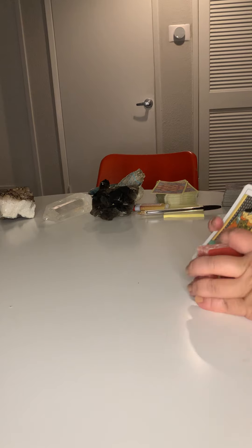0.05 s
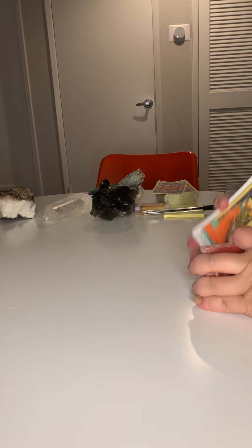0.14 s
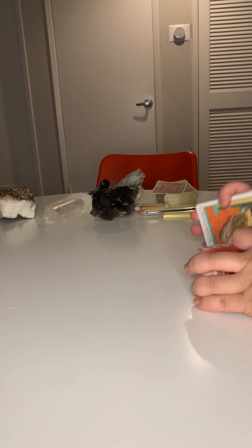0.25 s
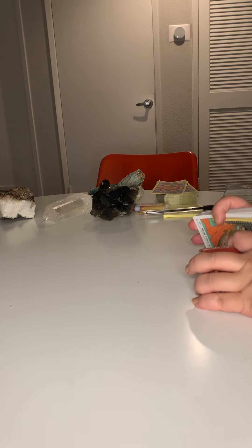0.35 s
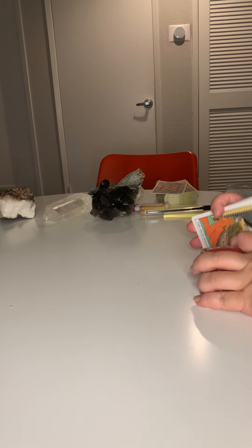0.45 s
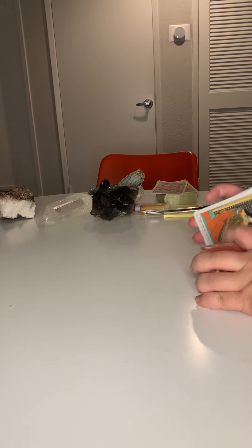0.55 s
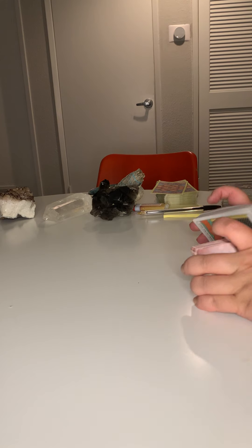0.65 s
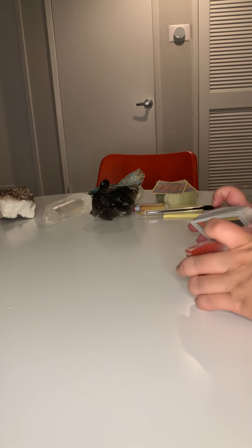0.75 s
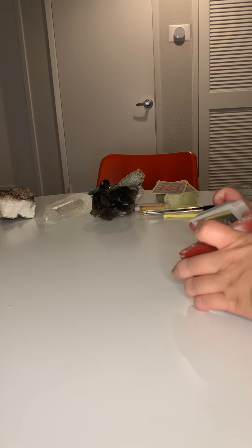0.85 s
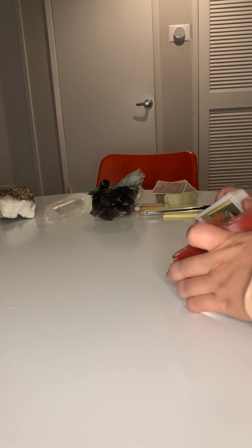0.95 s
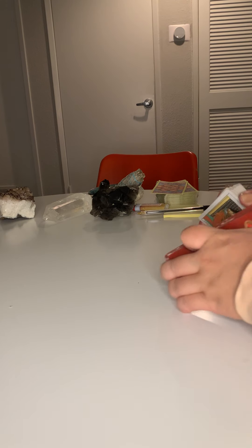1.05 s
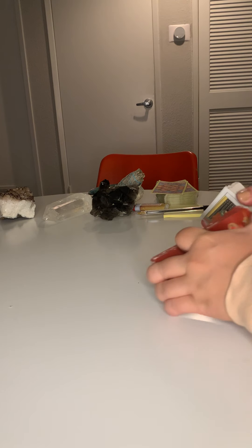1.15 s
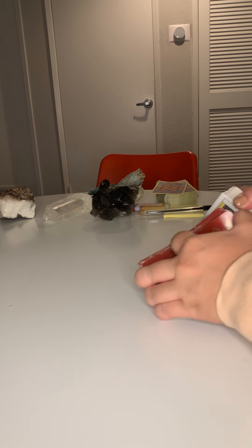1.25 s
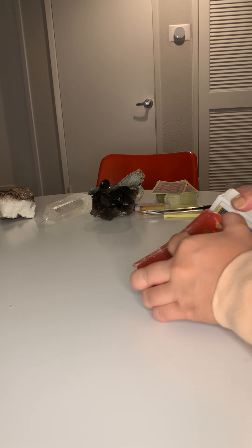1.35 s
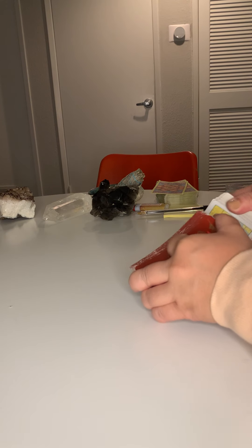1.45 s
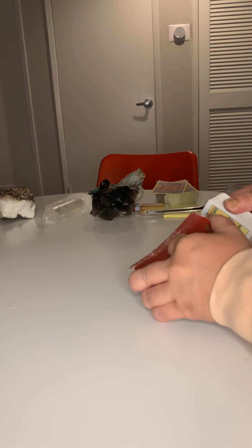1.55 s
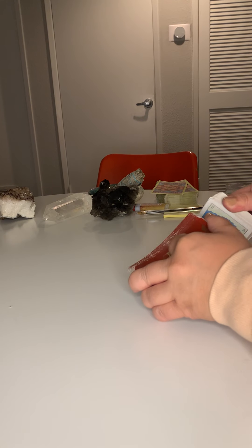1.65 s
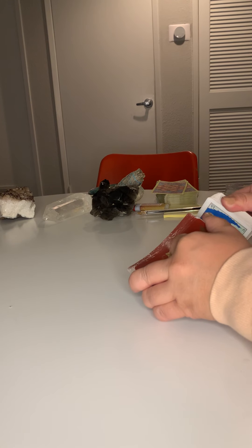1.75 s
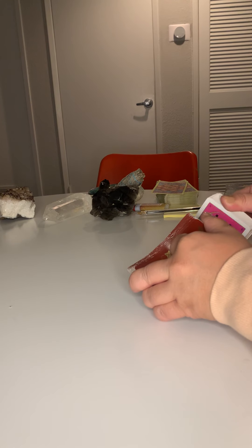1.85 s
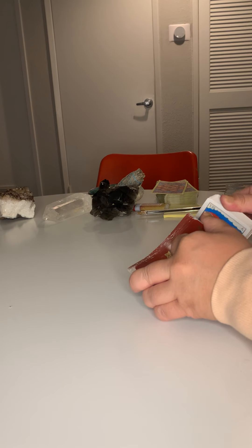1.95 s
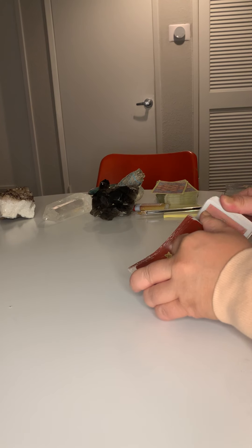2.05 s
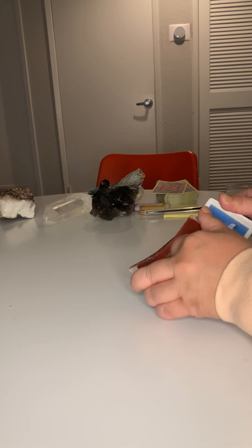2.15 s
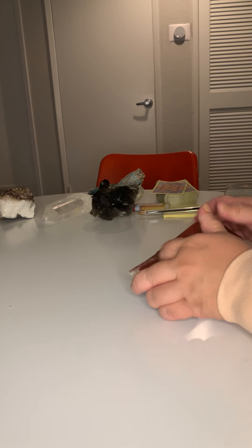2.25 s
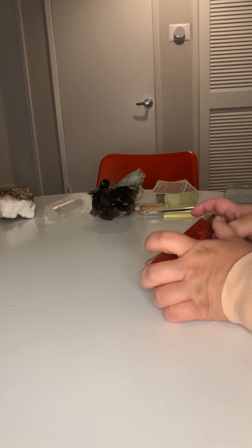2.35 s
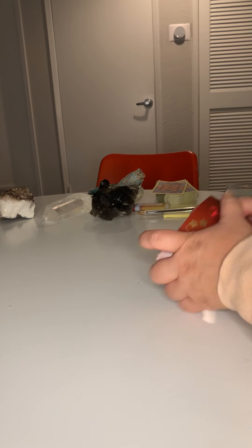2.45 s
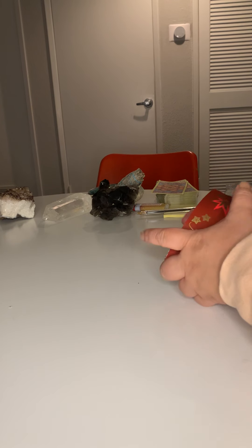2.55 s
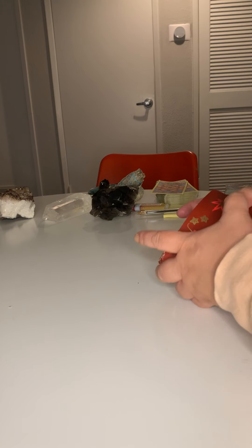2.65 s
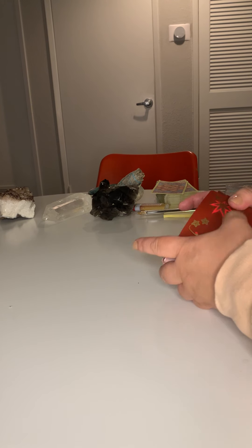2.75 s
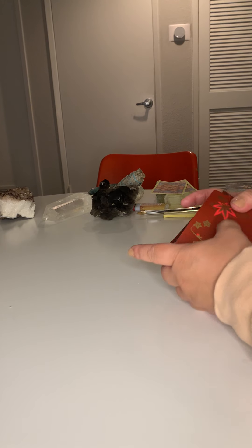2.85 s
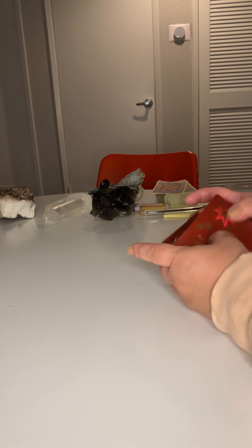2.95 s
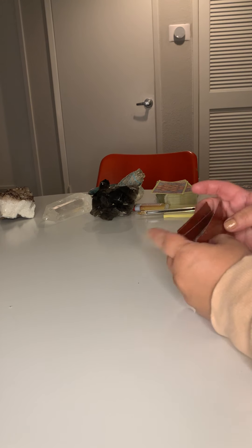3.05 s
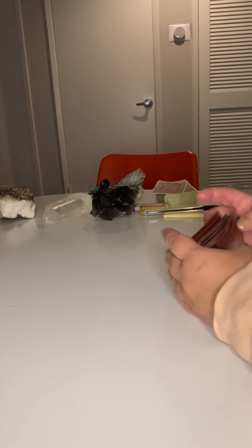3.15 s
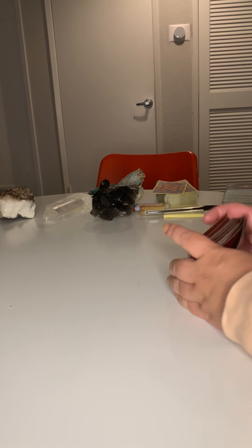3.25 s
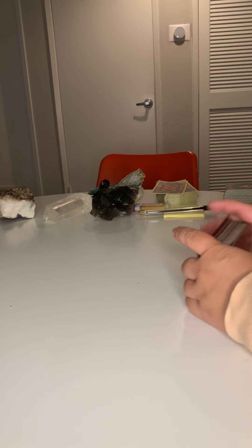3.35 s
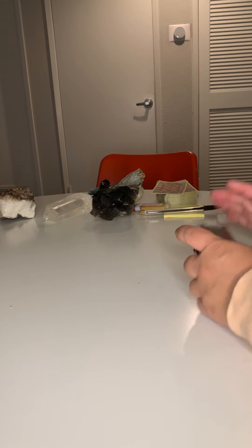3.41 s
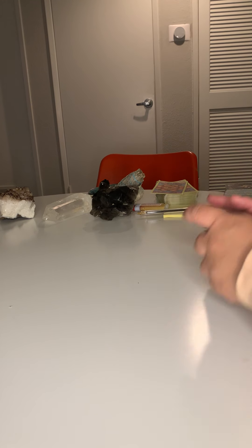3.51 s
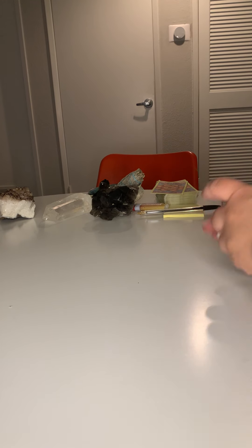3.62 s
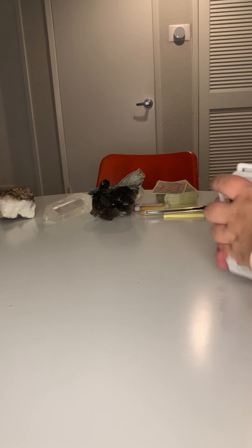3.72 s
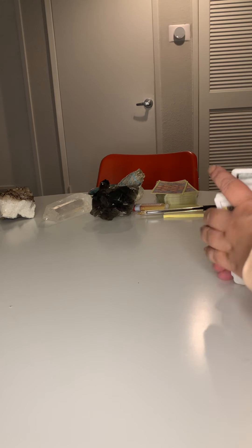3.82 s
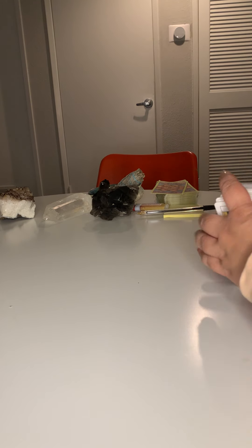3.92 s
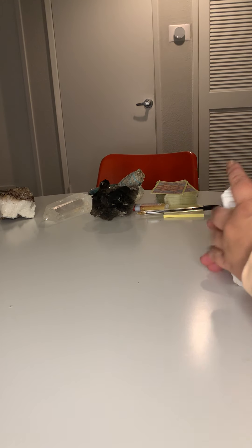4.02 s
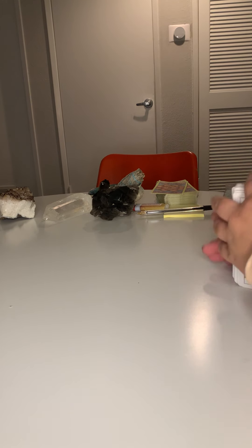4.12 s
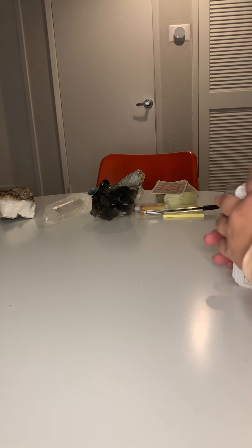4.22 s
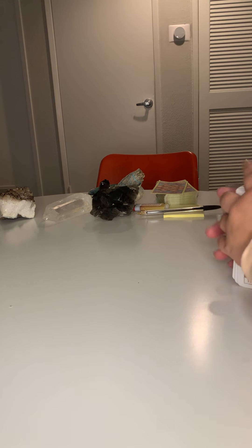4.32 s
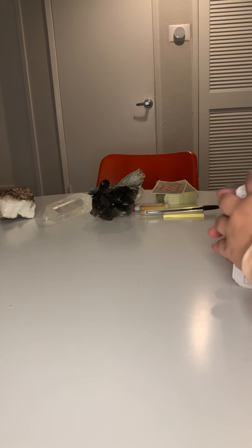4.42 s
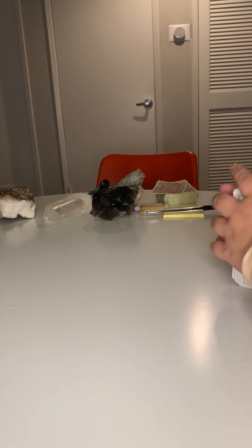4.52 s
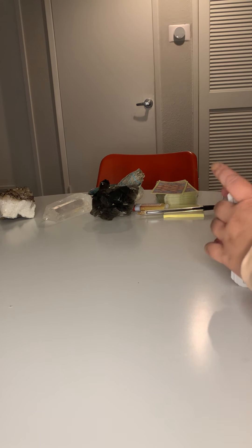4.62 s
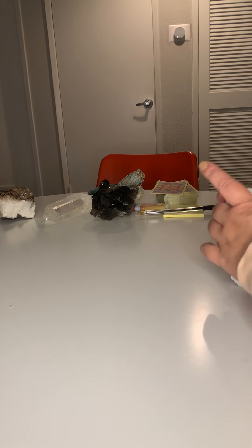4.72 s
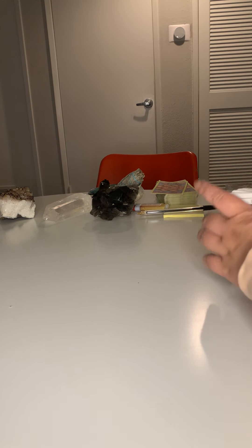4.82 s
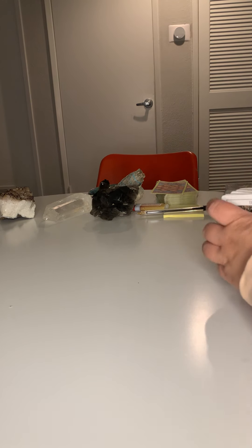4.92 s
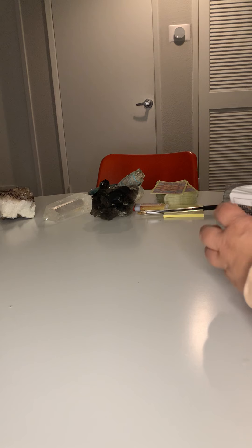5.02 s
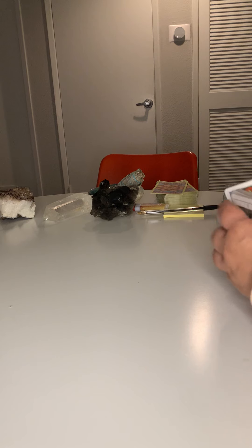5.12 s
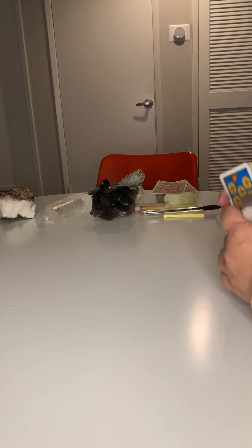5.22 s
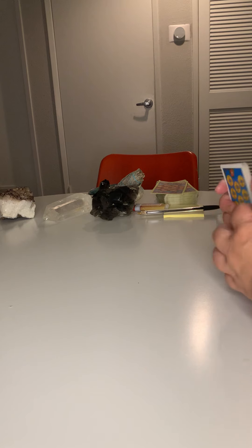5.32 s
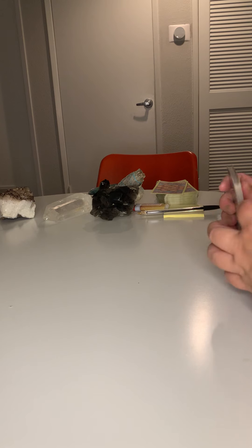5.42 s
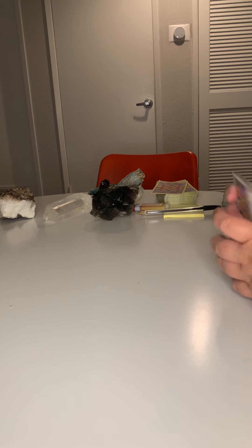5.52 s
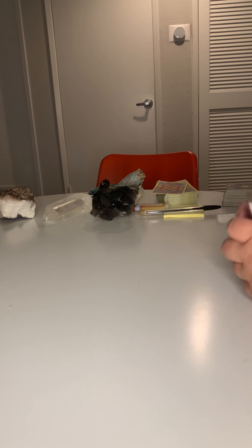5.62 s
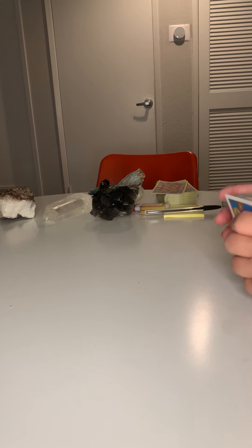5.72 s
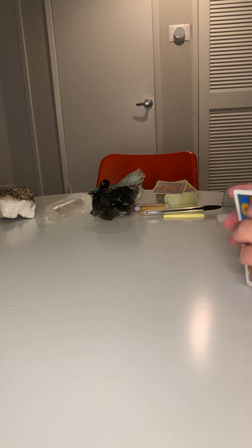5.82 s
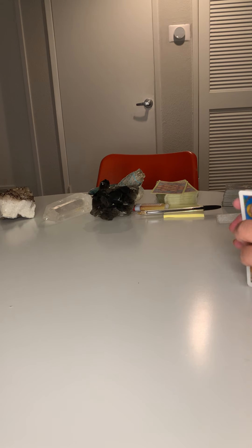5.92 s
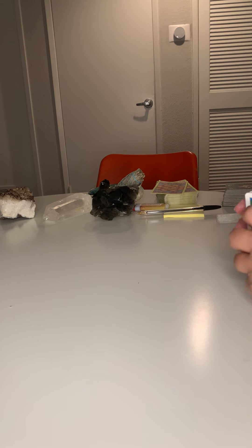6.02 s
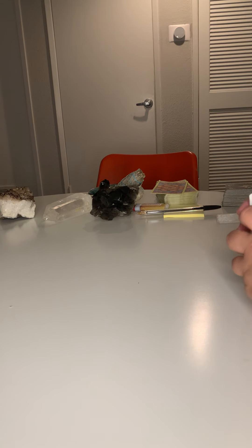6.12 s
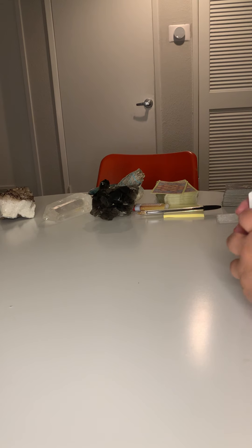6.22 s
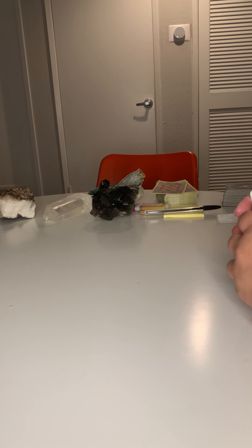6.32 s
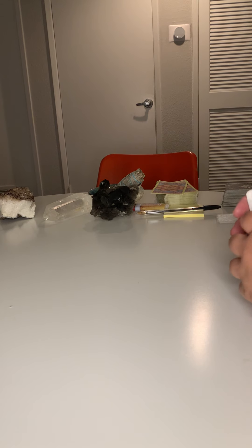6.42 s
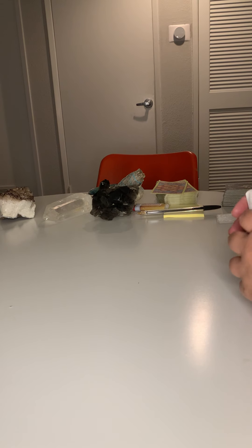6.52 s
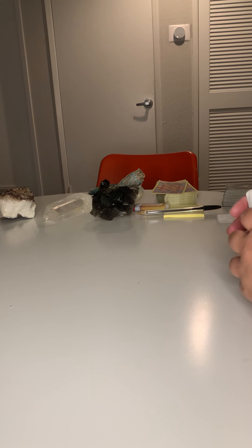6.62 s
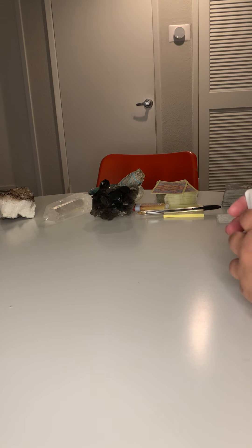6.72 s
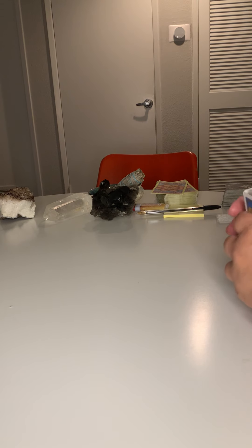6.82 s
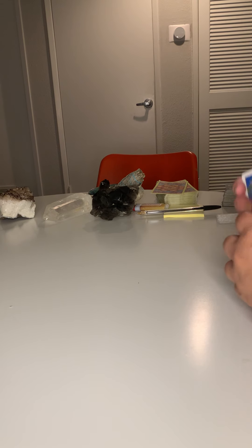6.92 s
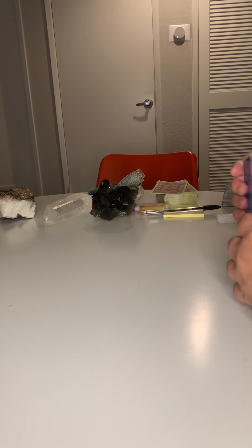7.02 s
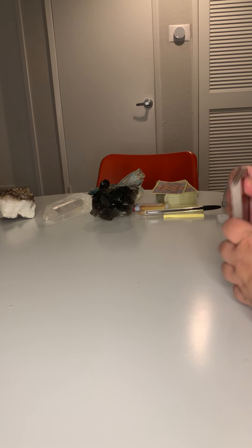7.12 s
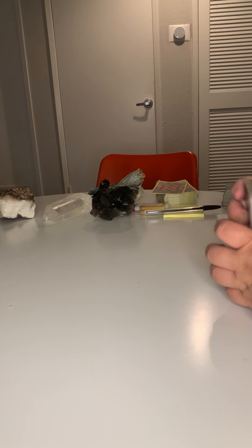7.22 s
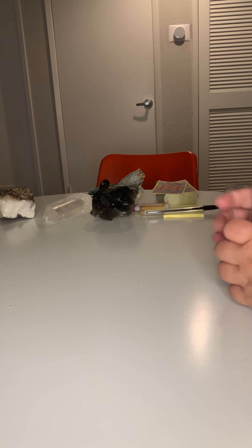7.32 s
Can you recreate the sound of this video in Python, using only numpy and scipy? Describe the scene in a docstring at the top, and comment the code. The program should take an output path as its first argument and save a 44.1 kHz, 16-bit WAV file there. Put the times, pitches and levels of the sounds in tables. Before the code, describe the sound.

Playing cards are handled at a table in a small bare room. A few dull knocks and papery rubs come first, then an uneven riffle of bright crackling snaps that thickens to a peak. A softer, smoother cascade follows, then knocks, sliding and gentle squaring taps. The two microphones are close, the riffle dry, the room echo short. A low motor hum and dull air noise stay underneath.

```python
"""Riffling a deck of cards

A deck of playing cards is riffled on a table in a small bare room, to one side of two microphones.
Snaps and knocks are short clicks and scrapes that ring the cards; sliding is grainy, shaped noise.
Echoes and fading noise make the room, over a low motor hum of wavering sines and dull, steady air noise."""
import sys
import numpy as np
from scipy import signal
from scipy.fft import rfft, irfft
from scipy.io import wavfile

SR = 44100
rng = np.random.default_rng(int(sys.argv[2]) if len(sys.argv) > 2 else 0)


def unload_audio(sound):
    """Save the sound as a 16-bit wav file, at the path given as the first command line argument."""
    columns = np.transpose(np.atleast_2d(sound))
    # keep every value between -1 and 1, then stretch to whole-number steps
    steps = np.round(np.clip(columns, -1, 1) * 32767)
    wavfile.write(sys.argv[1], SR, steps.astype(np.int16))


N = 324576

# the halves run off the thumbs: time_s [s], rub_db [dB], edge_hiss_db [dB]
RIFFLE = [(1.44, -81, -85.5), (1.49, -57, -57), (1.56, -56, -62), (1.63, -50, -49), (1.8, -61, -55),
          (2.065, -54, -48), (2.12, -43, -43), (2.19, -39.5, -34.5), (2.32, -64, -59.5), (2.5, -60.5, -67)]
# the arched deck falls flat in one cascade: time_s [s], rub_db [dB], edge_hiss_db [dB]
CASCADE = [(2.64, -78, -73), (2.709, -55, -46), (2.85, -50, -43.5), (2.98, -53, -48.5), (3.04, -47, -61),
           (3.11, -76, -86)]
# tone of rubbing card faces, only the shape counts: pitch_hz [Hz], level_db [dB]
RUB_COLOUR = [(80, -23), (250, 3), (600, 3.5), (1100, 1.5), (1700, 2), (2400, -15), (3700, -22),
              (5500, -37.5), (16000, -51.5)]
# tone of hissing card edges, only the shape counts: pitch_hz [Hz], level_db [dB]
HISS_COLOUR = [(300, -22), (2000, 5), (4000, 5.5), (6800, 4), (9000, -1.5), (12000, -0.5), (16000, -4.5)]


def amp(db):
    """Turns decibels into a gain."""
    return 10 ** (np.asarray(db) / 20)


def unit(x):
    """Scales a signal to an rms of 1."""
    return x / np.sqrt(np.mean(x ** 2) + 1e-20)


def read(points, hz):
    """Reads a table of (Hz, value) between its points, along a log-frequency axis."""
    table_hz, value = np.transpose(points)
    return np.interp(np.log(hz + 1), np.log(table_hz + 1), value)


def tinted(x, colour):
    """Filters a signal by a table of (Hz, dB)."""
    size = x.shape[-1]
    gain = amp(read(colour, np.fft.rfftfreq(size, 1 / SR)))
    return irfft(rfft(x) * gain, size)


def causal(gain):
    """Gives a filter with these gains the phase that makes it ring only after the blow."""
    cepstrum = irfft(np.log(np.maximum(gain, gain.max() * 1e-5)))
    half = len(cepstrum) // 2
    cepstrum[1:half] *= 2  # fold the part before time zero onto the part after it
    cepstrum[half + 1:] = 0
    return np.exp(rfft(cepstrum))


def diffuse(pair):
    """Makes two noises partly alike, pitch by pitch: wide in the upper middle, nearly the same in bass and treble."""
    # how alike left and right are: pitch_hz [Hz], likeness [0 to 1]
    likeness = [(60, 1), (130, 0.98), (290, 0.91), (600, 0.5), (1000, 0.13), (1700, 0.66), (2400, .1),
                (3400, 0.27), (4500, 1), (16000, 0.97)]
    left, other = rfft(pair)
    same = np.clip(read(likeness, np.fft.rfftfreq(pair.shape[1], 1 / SR)), -1, 1)
    right = same * left + np.sqrt(1 - same ** 2) * other
    return irfft(np.array([left, right]), pair.shape[1])


def wander(rate):
    """Joins random points, rate of them per second, into a curve of rms 1."""
    knots = rng.standard_normal(8192)
    return unit(np.interp(np.arange(N) / SR * rate, np.arange(len(knots)), knots))


def add(mix, s, sound):
    """Mixes a sound in at a time in seconds."""
    part = mix[max(round(s * SR), 0):][:len(sound)]
    part += sound[:len(part)]


def hum():
    """A motor drones at multiples of its speed; its speed wavers, and the upper multiples' levels waver most."""
    # multiples of the motor speed: multiple [whole number], level_db [dB rms before wavering]
    orders = [(1, -35), (2, -54), (3, -53.5), (4, -60.5), (5, -68)]
    speed_hz = 58.05
    turns = speed_hz * np.arange(N) / SR + 0.024 * wander(9)
    out = np.zeros(N)
    for k, (_, level_db) in enumerate(orders):
        level = np.sqrt(2) * amp(level_db + 0.062 * k * wander(2.5))
        out += level * np.sin(2 * np.pi * ((k + 1) * turns + rng.random()))
    return out


def air():
    """Ventilation makes steady, dull noise."""
    # tone of the still room, only the shape counts: pitch_hz [Hz], level_db [dB per Hz]
    air_colour = [(20, -22.5), (40, -13.5), (75, 1), (100, -2.5), (140, -8.5), (240, -11), (400, -16),
                  (650, -20), (1000, -28), (2000, -48), (4000, -52), (8000, -52), (16000, -51)]
    return amp(-54.5) * unit(tinted(diffuse(rng.standard_normal((2, N))), air_colour))


def friction(pressure_db, colour, grains_per_s, grain_share, patchy_db):
    """Paper fibres catch and let go: a light touch mostly brushes, a firm one crackles."""
    sizes = amp(4.6 * np.minimum(rng.exponential(1, N), 4))
    grains = rng.standard_normal(N) * sizes * (rng.random(N) < grains_per_s / SR)
    firm = np.clip((pressure_db + 78) / 30, .35, 1)
    share = grain_share * firm  # share of the power in separate grains
    texture = np.sqrt(share) * unit(grains) + np.sqrt(1 - share) * rng.standard_normal(N)
    return unit(tinted(texture, colour)) * amp(pressure_db + patchy_db * firm * wander(110))


def sliding():
    """In each stroke the card faces rub dully while their edges hiss and tick."""
    # slides of card on card: firmest_s [s], length_s [s], rub_db [dB], edge_hiss_db [dB]
    strokes = [(.01, 0.099, -53.5, -72.5), (0.113, 0.087, -53, -76), (.282, .014, -50, -52),
               (0.34, 0.52, -56, -75.5), (0.681, .06, -51.5, -74), (0.87, .08, -65, -79),
               (1.084, 0.2, -65.5, -76), (2.558, 0.12, -55.5, -59.5), (3.165, 0.077, -40, -82),
               (3.252, 0.2, -47, -58.5), (3.683, 0.19, -53, -61), (3.865, .18, -48, -80),
               (4.058, .3, -52, -84), (4.273, .16, -56, -99), (4.95, .07, -78, -79),
               (5.195, 0.21, -44, -67), (5.369, 0.22, -50, -76.5), (5.569, 0.093, -58, -65),
               (5.675, 0.12, -57.5, -65), (5.87, 0.2, -59.5, -74.5), (6.09, .33, -57.5, -77.5),
               (6.344, 0.063, -51.5, -83), (6.711, 0.066, -59.5, -74.5), (6.84, 0.056, -48, -64.5),
               (6.955, .1, -48.5, -76), (7.048, 0.044, -66.5, -62), (7.202, 0.16, -59, -89),
               (7.325, 0.18, -48.5, -60.5)]
    # the fingers never hold the deck quite still: rub_db [dB], edge_hiss_db [dB]
    holding = (-79, -94.5)
    swell_share, ends_db = 0.51, -10.5  # share of a stroke spent swelling; its ends relative to its peak
    t = np.arange(N) / SR
    power = np.outer(amp(holding) ** 2, np.ones(N))
    for firmest_s, length_s, *peak_db in strokes:
        near = abs(t - firmest_s) < 2 * length_s
        before = (firmest_s - t[near]) / swell_share
        after = (t[near] - firmest_s) / (1 - swell_share)
        away = np.maximum(before, after) / length_s
        power[:, near] += np.outer(amp(peak_db), amp(ends_db * away ** 1.18)) ** 2
    rub_db, hiss_db = 10 * np.log10(power)
    rub = friction(rub_db, RUB_COLOUR, grains_per_s=260, grain_share=0.72, patchy_db=5)
    hiss = friction(hiss_db, HISS_COLOUR, grains_per_s=410, grain_share=0.68, patchy_db=11.0)
    return amp(-4.0) * rub + amp(4.0) * hiss


def strikes(rows, modes, ring_q, ring, colour, presence_db, presence_share, soft_db, crisp_s,
            scatter, grit, drag_db, drag_s, bend_s, size=4096):
    """Each contact is a brief drag, a click and a gritty scrape that ring the cards; grip shifts the ringing."""
    # bass, middle, presence and treble bands: low_hz [Hz], high_hz [Hz]
    bands = [(200, 700), (700, 2200), (2200, 4500), (4500, 16000)]
    grip_db = 2.5  # spread of the resonance levels from grip to grip
    usual_contact_s = 0.0053  # contacts longer than this get more presence, shorter ones less
    before = size // 4  # samples ahead of the contact
    t = (np.arange(size) - before) / SR
    hz = np.fft.rfftfreq(size, 1 / SR)
    out = np.zeros(N)
    knees = np.ravel([(low * 1.15, high / 1.15) for low, high in bands])
    middle_octaves = np.log2(np.clip(hz, *bands[1]) / bands[1][0])
    presence_octaves = np.log2(np.clip(hz, *bands[2]) / bands[2][0])
    # bending waves travel slower at low pitch: the treble arrives first, a quick downward chirp
    bending = np.exp(-4j * np.pi * bend_s * np.sqrt(1000 * hz))  # bend_s is the travel time at 1000 Hz
    for strike_s, level_db, bass_db, bright_db, length_s, ring_hz in rows:
        noise, lumps, grip, damping = rng.standard_normal((4, size))
        u = np.maximum(t, 0) / max(length_s * 0.62, 1e-4)
        drag = amp(drag_db) * np.exp(-abs(t) / drag_s)  # faint rubbing around the contact
        scrape = noise * np.exp(grit * lumps) * (np.sqrt(u) * np.exp(-u) + drag)
        click = np.exp(-length_s / crisp_s)  # share of the power: short contacts are more click
        force = scrape / np.linalg.norm(scrape) * np.sqrt(1 - click)
        force[before] += np.sqrt(click)

        # each grip retunes the resonances and changes their level
        resonances = [(ring_hz, ring_hz / ring_q, read(ring, ring_hz))]
        for (pitch_hz, width_hz, db), shift, held in zip(modes, grip, damping):
            resonances.append((pitch_hz * (1 + scatter * shift), width_hz, db + grip_db * held))
        body = amp(read(colour, hz)) ** 2  # power at each pitch
        for pitch_hz, width_hz, db in resonances:
            body = body + amp(db) ** 2 / (1 + ((hz - pitch_hz) / width_hz) ** 2) ** 2
        # a cushioned, bassy blow is dull in the middle too (dB per octave)
        body = body * amp(-.8 * max(bass_db + 5, 0) * middle_octaves) ** 2
        # a soft contact fades across the presence band (dB per octave)
        body = body * amp(-.9 * max(-12 - bright_db, 0) * presence_octaves) ** 2

        # a harder edge lifts the treble, and the presence band with it
        push = rfft(force)
        power = abs(push) ** 2 * body
        natural_db = [10 * np.log10(power[(hz > low) & (hz < high)].sum()) for low, high in bands]
        upper_mid_db = presence_db + presence_share * bright_db + soft_db * np.log2(length_s / usual_contact_s)
        wanted_db = np.array([bass_db, 0, upper_mid_db, bright_db])
        tilt_db = np.repeat(wanted_db - natural_db, 2)
        gain = np.sqrt(body) * amp(read(np.c_[knees, tilt_db], hz))
        sound = irfft(push * bending * causal(gain))
        sound = sound / np.linalg.norm(sound) * np.sqrt(SR / 100)  # rms of 1 if packed into 10 ms
        add(out, strike_s + t[0], amp(level_db) * sound)
    return out


def tapping():
    """The deck knocks on fingers and table and rings as it is held in the hands."""
    # knocks: strike_s [s], level_db [dB before the trim below], bass_db and brightness_db [dB over the middle],
    # contact_s [s], ring_hz [Hz]
    knocks = [(.118, -48.5, 0, -29, 0.0091, 1200), (.2303, -39, 0.5, -17.5, 0.0026, 1630),
              (.2808, -30, -9, -9.5, 0.0011, 1000), (.304, -24.5, -8, -29, 0.0033, 1570),
              (.6492, -36, -4, -20, 0.0015, 1790), (.8914, -53, -25, -2, 0.0018, 1450),
              (3.0235, -32.5, -8, -23, 0.0065, 1720), (3.1282, -31, -8, -19, 0.0054, 1640),
              (3.1422, -26, -16.5, -10, 0.0067, 1710), (3.1732, -29.5, -26, -19, 0.0069, 1865),
              (3.2009, -36.5, -12, -2, 0.0018, 1810), (3.2527, -32, -12, -25, 0.017, 1930),
              (3.3226, -26, -11, 5.5, 0.00046, 1800), (3.7659, -25, -10, -12, 0.0044, 1130),
              (3.9157, -35, 3.5, -21, 0.0024, 1125), (3.9375, -35.5, -5, -33, 0.013, 1730),
              (3.9645, -33.5, -12.5, -10.5, 0.0026, 2030), (4.0167, -39, -13, -15.5, 0.0051, 2210),
              (4.0967, -38, -7, -15, 0.0052, 1694), (4.1451, -43.5, -8, -10.5, .004, 2430),
              (4.1802, -35.5, -11, -8.5, 0.003, 1650), (4.2342, -38.5, -10, -24.5, 0.007, 1690),
              (4.2505, -37.5, -1, -30, 0.0032, 954), (4.267, -40.5, -11, -19.5, 0.0045, 1796),
              (4.3609, -44, -4.5, -35, 0.0098, 1717), (4.5275, -49, -11, -27.5, 0.006, 1750),
              (4.609, -43.5, -8, -32.5, 0.006, 1450), (4.622, -49.5, -5.5, -33, .006, 1150),
              (5.0079, -46, -7, -36, 0.0066, 1652), (5.085, -45, -3, -36, .006, 1100),
              (5.1089, -35, -1, -30, 0.0052, 1577), (5.133, -37.5, -3, -32, 0.0047, 1306),
              (5.147, -37.5, -10, -26, 0.0055, 1700), (5.157, -30, -9, -29, 0.0062, 1120),
              (5.1764, -34, -11, -19, 0.005, 1120), (5.2, -33.5, -11, -13, 0.005, 1700),
              (5.2095, -26, -10, -11.5, 0.0044, 1130), (5.342, -46, 4, -35, 0.0048, 800),
              (5.4216, -46, -8, -32, .005, 1700), (5.5513, -34.5, 4, -30, 0.0019, 737),
              (5.6247, -22.5, -6, -9, 0.0032, 3460), (5.629, -28, -3.5, -28.5, 0.0022, 1100),
              (5.631, -34.5, 5, -34, .002, 240), (5.79, -48, -6, -32, .006, 1097),
              (5.8452, -37.5, -2.5, -42, 0.0087, 1610), (5.9691, -31, -11, -18, 0.0098, 1934),
              (6.3025, -33, -9.5, -18.5, 0.005, 1150), (6.3129, -31.5, -12.5, -19.5, 0.005, 1345),
              (6.3623, -34, -6, -16.5, 0.0098, 1100), (6.7771, -41, 7, -47, 0.011, 570),
              (6.8252, -30.5, -11.5, -17.5, 0.006, 1120), (6.9344, -33.5, -0.5, -48, 0.01, 600),
              (6.9493, -37.5, -2, -37, 0.004, 604), (6.968, -41.5, 0, -35, 0.0043, 1500),
              (7.1542, -31, 5.5, -49, 0.0012, 299), (7.163, -44, -1, -46, .002, 950),
              (7.237, -34.5, -14, -17.5, 0.0062, 1130), (7.27, -49, -5, -32, .006, 1300),
              (7.3267, -28, -5, -20.5, 0.0051, 1670), (7.346, -28, -54, -13, 0.0038, 1670)]
    # resonances of the held deck before grip shifts them: pitch_hz [Hz], width_hz [Hz], level_db [dB]
    deck = [(239, 19, 6), (387, 140, -6.5), (605, 48, -2.5), (743, 49, -6), (951, 42, 2.5), (1108, 55, 5),
            (1434, 82, 2), (1673, 120, -1.5), (1910, 240, -6.5), (2550, 340, -8)]
    # how far the ring stands out: ring_hz [Hz], level_db [dB]
    ring = [(240, 5), (450, 0), (1100, 3), (2400, 1), (3500, 9)]
    # broad tone under the resonances: pitch_hz [Hz], level_db [dB]
    colour = [(60, -34.5), (200, -13.5), (500, -6), (1500, -8.5), (2400, -10), (3800, -8.5), (4600, -16),
              (6500, -29), (9000, -39.5), (16000, -44.5)]
    return amp(-1.76) * strikes(
        knocks, deck, 14, ring, colour, presence_db=3.5, presence_share=0.73, soft_db=2.5, crisp_s=0.0026,
        scatter=.035, grit=0.45, drag_db=-18.5, drag_s=0.005, bend_s=.0006)


def riffling():
    """Between the loud snaps the riffle crackles in separate grains; the cascade runs more smoothly."""
    # grain of the edge hiss: grains_per_s [1/s], power_share [0 to 1, at a firm touch], patchiness_db [dB]
    riffle_grain = (260, .85, 4)
    cascade_grain = (780, 0.28, 2.2)  # same columns
    t = np.arange(N) / SR
    out = np.zeros(N)
    for run, grain in ((RIFFLE, riffle_grain), (CASCADE, cascade_grain)):
        time_s, rub_db, hiss_db = np.transpose(run)
        rub = friction(np.interp(t, time_s, rub_db), RUB_COLOUR, grains_per_s=180, grain_share=0.76, patchy_db=2)
        hiss = friction(np.interp(t, time_s, hiss_db), HISS_COLOUR, *grain)
        during = (t > time_s[0]) * (t < time_s[-1])
        out += (amp(-4) * rub + amp(3.8) * hiss) * during
    return out


def flicks():
    """Lists single cards flicking off at uneven times, with levels that follow the edge hiss tables."""
    # the usual flick: bass_db [dB], brightness_db [dB], contact_s [s], ring_hz [Hz]
    usual_flick = (-6, 0, .0008, 1900)
    bass_db, bright_db, length_s, ring_hz = usual_flick
    flicks_per_s, over_hiss_db, spread_db = 55, 5, 3.5
    rows = []
    for run in (RIFFLE, CASCADE):
        time_s, _, hiss_db = np.transpose(run)
        beats = np.arange(round(time_s[0], 1), round(time_s[-1], 1), 1 / flicks_per_s)
        chances = np.clip(rng.standard_normal((128, 4)), -2, 2)
        for beat, (late, force, edge, grip) in zip(beats, chances):
            at = beat + late / flicks_per_s / 2
            level_db = np.interp(at, time_s, hiss_db) + over_hiss_db + spread_db * force
            rows.append((at, level_db, bass_db, bright_db + 4 * edge, length_s, ring_hz * np.exp(0.27 * grip)))
    return rows


def snapping():
    """Card edges flick past one another, loud snaps and small flicks alike, and ring a bent packet."""
    # loud snaps: strike_s [s], level_db [dB before the trim below], bass_db and brightness_db [dB over the middle],
    # contact_s [s], ring_hz [Hz]
    loud_snaps = [(1.444, -47.5, -12, 15.5, 0.0011, 1800), (1.4666, -33.5, -2.5, 7, 0.0016, 1210),
                  (1.4735, -31.5, -2, 0.5, 0.0027, 1540), (1.5268, -35.5, -3, 1.5, 0.0014, 865),
                  (1.5684, -39, -2, 0, 0.0038, 1290), (1.587, -35, -4.5, 1, 0.0023, 1500),
                  (1.5942, -25, -7.5, 0, 0.0025, 1470), (1.598, -26, -0.5, -8.5, 0.00089, 1090),
                  (1.614, -26, -2, 0.5, 0.002, 1560), (1.618, -26.5, -0.5, 8, 0.0014, 1560),
                  (1.669, -34, 1, -2.5, 0.0018, 800), (1.6848, -21.5, -4, -9.5, 0.00076, 1020),
                  (1.7102, -30.5, -3.5, 1.5, 0.0015, 1460), (1.7312, -20, -12.5, -4.5, 0.0012, 2600),
                  (1.7645, -33.5, -4.5, -2, .0015, 1400), (1.7701, -32, -2, -1, 0.0023, 1620),
                  (1.813, -39, -8, 12, 0.002, 1800), (1.8295, -13.5, -13, -6.5, 0.00095, 1420),
                  (1.842, -27.5, -5.5, -2, .003, 2500), (1.8896, -26.5, -21, 12, 0.00085, 900),
                  (1.8909, -15, -16, -1.5, 0.0012, 1890), (1.8953, -18.5, -13.5, -11, 0.00097, 2700),
                  (1.9567, -16.5, -9.5, -6, 0.0035, 1300), (1.9811, -20.5, -13.5, -1, 0.0024, 1360),
                  (1.9999, -19, -10.5, -10.5, 0.00041, 1490), (2.0092, -20, -9.5, 0.5, 0.0012, 1260),
                  (2.0185, -23, -5.5, 12.5, 0.0014, 1630), (2.0734, -22.5, -6, -8.5, 0.00046, 965),
                  (2.0828, -14.5, -7, 8.5, 0.0011, 1350), (2.0915, -28, -8, 9, 0.0009, 1900),
                  (2.1008, -24.5, -13, 3, 0.003, 1710), (2.1046, -18, -14, -1, 0.00087, 2420),
                  (2.1113, -20.5, -13, -3, 0.0031, 2640), (2.1297, -21, -9.5, -0.5, 0.0017, 1730),
                  (2.1507, -25, -6.5, -9.5, 0.0019, 1310), (2.1556, -22, -3.5, 1.5, 0.0016, 1380),
                  (2.1705, -27, -6, 6, .0008, 1600), (2.1748, -25.5, -1, 2, 0.0011, 1170),
                  (2.178, -27.5, -3, 3, 0.00093, 1300), (2.1865, -21.5, -10, 2, .003, 3960),
                  (2.191, -20, -9, 2, 0.0036, 4050), (2.197, -23, -9, 1, .002, 3900),
                  (2.2004, -24, -4, 11.5, 0.0015, 1450), (2.2145, -28.5, -6, -1.5, .0015, 2010),
                  (2.2304, -22.5, -9.5, -7, 0.0014, 1720), (2.2515, -34, -4, -3, 0.0022, 1700),
                  (2.27, -32, -5.5, -5.5, .002, 1490), (2.3464, -41, -17, 7, 0.0017, 1580),
                  (2.6918, -43, -6, 15, 0.0011, 1700), (2.7133, -38.5, -3, -2, 0.0014, 1780),
                  (2.717, -34.5, -3, 2, 0.0011, 1400), (2.7323, -33, -5, 5, 0.0037, 1800),
                  (2.749, -32, -5, 6, 0.0048, 2200), (2.7601, -27.5, -3.5, -10, 0.00091, 1030),
                  (2.7645, -31, -5, 8, 0.0022, 1700), (2.7795, -27.5, -5, -7, 0.00082, 1400),
                  (2.8003, -29.5, 1.5, -17, 0.00094, 900), (2.8181, -27, -6.5, -12, 0.0008, 1100),
                  (2.832, -36, -1, 4, 0.0009, 1400), (2.8418, -29.5, -4, -9, 0.00065, 990),
                  (2.8448, -31, -6, -9, .0007, 1500), (2.8655, -35, -3, 7, 0.0006, 1530),
                  (2.873, -34, -2, 9, 0.0006, 900), (2.9128, -29, -12, 6.5, 0.0006, 1600),
                  (2.9218, -25.5, -7, 4.5, 0.0013, 1490), (2.9455, -34, 0, 3, 0.001, 900),
                  (2.9487, -36, -4, 14, .001, 1500), (2.9815, -34, 0, 8, 0.00079, 1200),
                  (2.989, -37.5, -3, 9, .001, 1670)]
    # resonances of the bent packet before grip shifts them: pitch_hz [Hz], width_hz [Hz], level_db [dB]
    packet = [(781, 490, -5), (1350, 130, -4.5), (1517, 100, -5), (1774, 170, -2), (2850, 99, -7.5),
              (4070, 120, -5), (6360, 5500, -15.5)]
    # how far the ring stands out: ring_hz [Hz], level_db [dB]
    ring = [(800, .5), (2600, 1), (4000, 6)]
    # broad tone under the resonances: pitch_hz [Hz], level_db [dB]
    colour = [(60, -34), (200, -13.5), (500, -3.5), (1500, -8.5), (2500, -15), (3400, -21), (8000, -20),
              (12000, -19), (16000, -22.5)]
    return amp(-0.5) * strikes(
        loud_snaps + flicks(), packet, 10, ring, colour, presence_db=-2.0, presence_share=0.41, soft_db=0.84,
        crisp_s=0.0012, scatter=.025, grit=0.66, drag_db=-29, drag_s=.005, bend_s=.0009, size=2048)


def room(x, wet_db, early_db, count=3):
    """Near echoes, then dense reflections that die band by band, blended in turn from several random noise tails."""
    # time to fade by 60 dB: pitch_hz [Hz], fade_s [s]
    fade_times = [(150, 0.11), (300, 0.5), (700, 0.42), (1700, 0.41), (3500, 0.52), (6500, .42),
                  (10000, 0.37), (16000, 0.19)]
    # tone of the reflections, only the shape counts: pitch_hz [Hz], level_db [dB]
    room_colour = [(100, 13), (260, 8), (520, 1.5), (900, 0.5), (1350, -0.5), (2000, 1.5), (2700, 2.5),
                   (3500, 1.5), (7000, -2), (15000, 1.5)]
    # nearby surfaces: delay_s [s, before a small random shift], level_db [dB, before early_db]
    surfaces = [(.0024, -6), (.0058, -35), (.0108, -25), (0.0119, -9.5), (.0195, -20)]
    out = np.zeros((2, N))
    for k in range(count):
        hz, t, z = signal.stft(diffuse(rng.standard_normal((2, SR))), SR, nperseg=256)
        fade_db = -60 * t / read(fade_times, hz)[:, None]
        z = z * amp(read(room_colour, hz)[:, None] + fade_db)
        tail = signal.istft(z, SR, nperseg=256)[1][:, :SR]
        tail = tail * np.clip((np.arange(SR) / SR - .003) / 0.0024, 0, 1)  # fades in after 3 ms
        tail = amp(wet_db) * tail / np.linalg.norm(tail[0])
        # each tail's share of the sound swells and fades in turn
        share = np.sqrt(2 / count) * np.cos(np.pi * (2.7 * np.arange(N) / SR + k / count))
        out += signal.fftconvolve((x * share)[None], tail, axes=1)[:, :N]
    early = np.zeros((2, SR // 20))
    for delay_s, db in surfaces:
        for side, skew_s in zip(early, rng.uniform(-0.00016, .0001, 2)):
            add(side, delay_s + skew_s, amp(db + early_db) * np.array([.25, .6, .25]))
    return out + signal.fftconvolve(x[None], early, axes=1)[:, :N]


def spaced(pair):
    """Treble reaches the left channel a little ahead of the right; the middle leans right."""
    # how far left runs ahead: pitch_hz [Hz], lead [radians]
    lead = [(0, 0), (100, 0), (600, -.5), (1000, -.1), (2000, .3), (3300, 1.3), (4700, 3.14), (9000, 9.42),
            (13250, 15.7), (16000, 19.7)]
    # left minus right: pitch_hz [Hz], difference_db [dB]
    lean = [(100, 0), (300, -1.2), (600, -1.4), (1100, -.4), (2200, -1.3), (4200, 0), (16000, 0)]
    hz = np.fft.rfftfreq(N, 1 / SR)
    phase = np.interp(hz, *np.transpose(lead))
    half = np.exp(1j * phase / 2) * amp(read(lean, hz) / 2)  # each side takes half
    return irfft(rfft(pair) * np.array([half, 1 / half]), N)


def scene():
    """The riffle is close and dry; the deck is squared further off, so more of it goes to the room."""
    snaps = snapping()
    taps = tapping()
    slide = riffling() + sliding()
    into_room = amp(-5.3) * snaps + taps + amp(-0.5) * slide
    walls = room(into_room, wet_db=-4.0, early_db=-6)
    return spaced(snaps + taps + slide + walls + air()) + hum()


def record(dry):
    """Rounds off the loudest peaks at 0.85 of full scale, then cuts what lies above the band limit."""
    held = dry / (1 + abs(dry / .85) ** 6) ** (1 / 6)
    low_pass = signal.firwin(255, 15900, window=("kaiser", 8), fs=SR)  # limit in Hz
    return signal.oaconvolve(held, low_pass[None], "same")


dry = scene()
out = record(dry)
unload_audio(out)
```